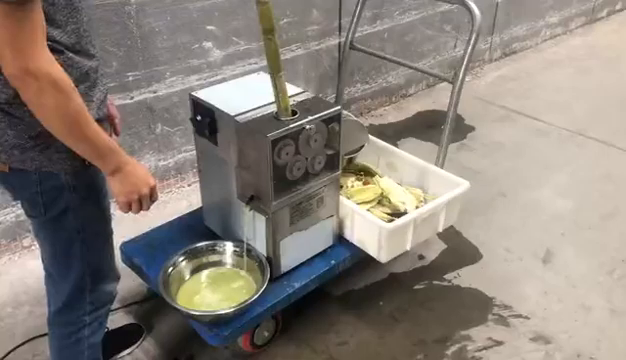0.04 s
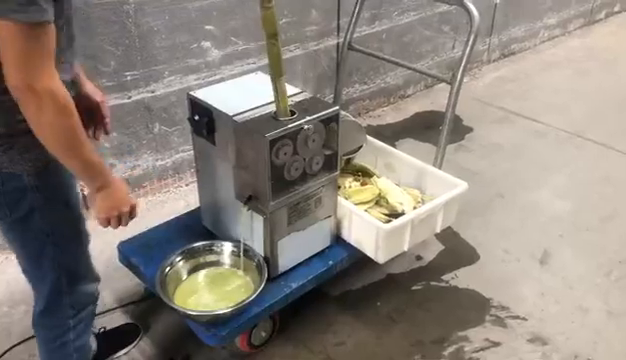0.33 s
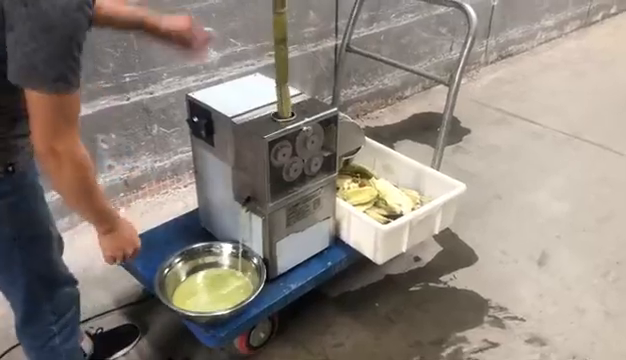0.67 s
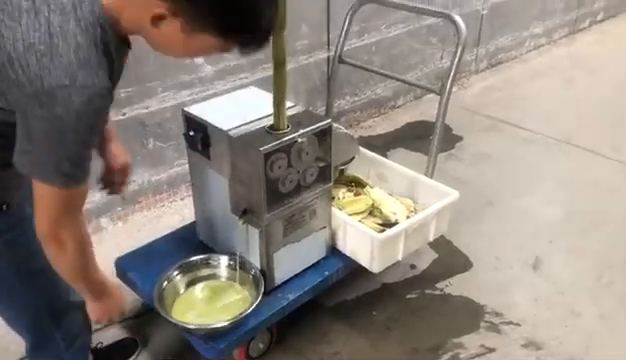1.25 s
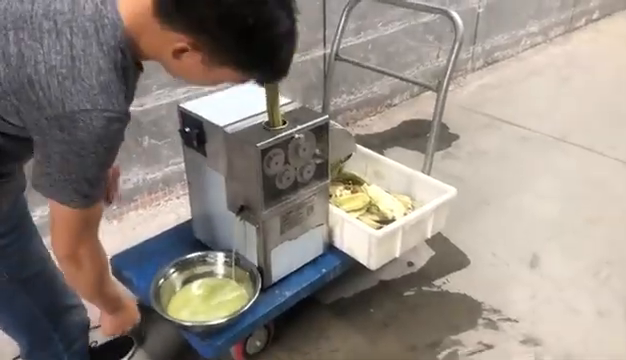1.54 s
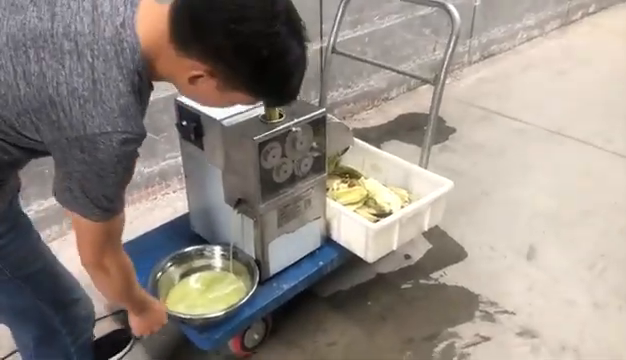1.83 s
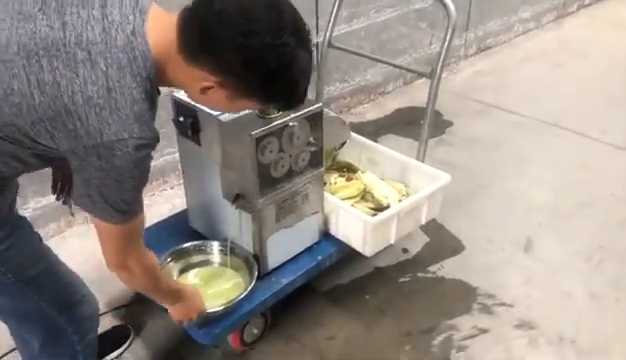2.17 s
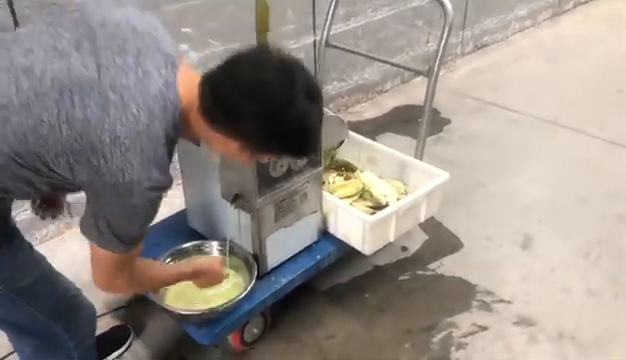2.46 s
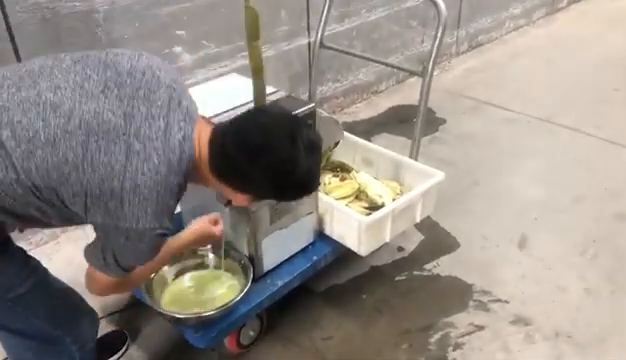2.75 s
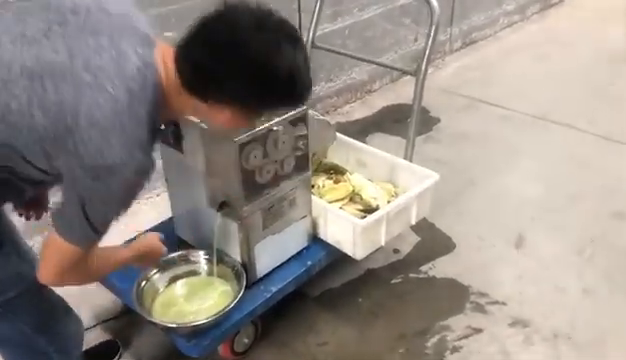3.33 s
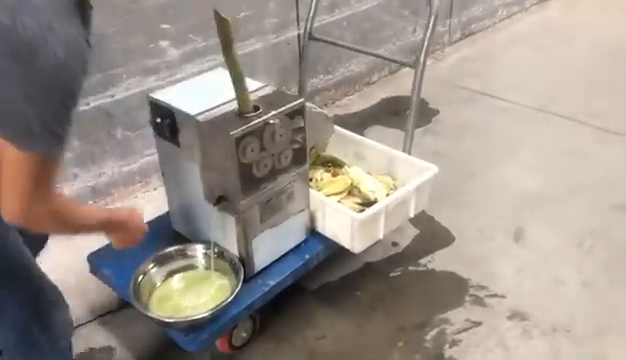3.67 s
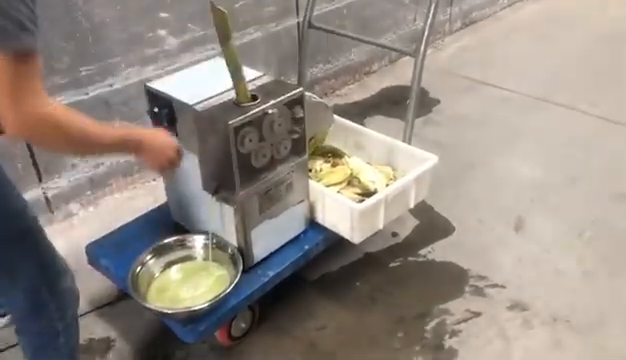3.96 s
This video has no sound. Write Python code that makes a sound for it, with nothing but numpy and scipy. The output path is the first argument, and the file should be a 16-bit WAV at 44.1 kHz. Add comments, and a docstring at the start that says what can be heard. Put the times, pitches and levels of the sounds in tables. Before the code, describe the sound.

A sugarcane juicer drones and grinds straight ahead of the microphone, outdoors near a wall. The cane crackles and snaps in the rollers, a panel hums briefly, then louder cracks come with housing thuds and a steel clack.

```python
"""A motor hums and gears whine and grind in a steel housing while wet fibres crackle:
an electric sugarcane juicer draws a stalk through its rollers. Now and then the stalk splits
with a crack, panels hum up under the strain, the housing thuds and the rollers clack.
The yard is paved; a wall close behind reflects the snaps and knocks."""
import sys
import numpy as np
from scipy import signal
from scipy.fft import rfft, irfft
from scipy.io import wavfile
from scipy.ndimage import uniform_filter1d

SR = 44100
rng = np.random.default_rng(int(sys.argv[2]) if len(sys.argv) > 2 else 0)


def wav_out(sig):
    """Save sig, one row per channel (or a flat mono array), as 16-bit PCM at SR to the path in sys.argv[1]."""
    wavfile.write(sys.argv[1], SR, np.round(np.clip(np.atleast_2d(sig).T, -1, 1) * 32767).astype(np.int16))


N = 176400
T = np.arange(N) / SR


def undb(db):
    """Decibels to gain."""
    return 10 ** (np.asarray(db) / 20)


def unit(x):
    """Scale to rms 1."""
    return x / np.sqrt(np.mean(x ** 2) + 1e-18)


def band(x, centre_hz, width_hz):
    """One resonance."""
    q = centre_hz / min(width_hz, SR / 4)
    return signal.lfilter(*signal.iirpeak(centre_hz, q, fs=SR), x)


def below(x, cutoff_hz):
    """Zero-phase low-pass."""
    return signal.sosfiltfilt(signal.butter(2, cutoff_hz, fs=SR, output="sos"), x)


def colour(x, points):
    """Shape the spectrum by (freq_hz, gain_db) points."""
    freq_hz, gain_db = np.array(points).T
    bin_hz = np.maximum(np.arange(N // 2 + 1) * SR / N, 1)
    return irfft(rfft(x) * undb(np.interp(np.log(bin_hz), np.log(freq_hz), gain_db)), N)


def walk(steps_per_s):
    """Smooth random drift, rms 1."""
    hold = max(int(SR / steps_per_s), 2)
    steps = rng.standard_normal(N)[np.arange(N) // hold]
    return unit(uniform_filter1d(uniform_filter1d(steps, hold), hold))


def clicks(per_s, scatter_db):
    """Impulses of random time, size and sign, rms 1."""
    size = undb(scatter_db * np.minimum(rng.exponential(size=N), 4))
    hits = rng.random(N) < per_s / SR
    return unit(hits * size * np.sign(rng.standard_normal(N)))


def tone(pitch_hz):
    """Sine on a moving pitch, rms 1."""
    return np.sqrt(2) * np.sin(2 * np.pi * (np.cumsum(pitch_hz) / SR + rng.random()))


def fade(start_s, decay_s):
    """Full level until start_s, then exponential decay."""
    return np.exp(-np.clip((T - start_s) / decay_s, 0, 20))


# Motor speed: time_s, pitch_hz
MOTOR_PITCH = [(0, 55.9), (1.6, 55.9), (1.75, 54.6), (4, 54.6)]


def motor_hum(level_db=-58, waver_db=.6):
    """The hum sags in pitch as the stalk gets thicker."""
    pitch_hz = np.interp(T, *np.array(MOTOR_PITCH).T)
    return tone(pitch_hz) * undb(level_db + waver_db * walk(8.4))


# Harmonics of the tooth rate: order, level_db
MESH_HARMONICS = [(2, -59.5), (3, -62.5), (4, -70), (5, -64.5), (10, -67), (12, -71.5)]


def gear_whine(mesh_hz=196.1, wander=.00203, waver_db=1.5):
    """Meshing teeth sound harmonics that drift together in pitch and waver singly in level."""
    tooth_hz = mesh_hz * (1 + wander * walk(12))
    out = np.zeros(N)
    for order, level_db in MESH_HARMONICS:
        out += undb(level_db) * unit(tone(order * tooth_hz) * undb(waver_db * walk(16)))
    return out


# Resonant machine parts: pitch_hz, width_hz, level_db
PART_MODES = [(68, 8, -71), (83, 3, -68), (94.5, 3, -62), (109, 6, -65), (163, 6, -63.5), (187, 5, -65),
              (203, 8, -65), (263, 6, -66), (298, 8, -65), (371, 6, -66), (456, 6, -69), (614, 8, -67),
              (688, 8, -69), (933, 14, -68), (1136, 10, -66)]


def part_drones():
    """Parts shaken by the drive drone in narrow bands."""
    out = np.zeros(N)
    for pitch_hz, width_hz, level_db in PART_MODES:
        shaken = band(rng.standard_normal(N), pitch_hz, width_hz)
        out += undb(level_db) * unit(band(shaken, pitch_hz, width_hz))
    return out


# Grinding spectrum: freq_hz, gain_db
GRIND_SPECTRUM = [(20, -15), (40, -7.5), (70, -2), (100, 3), (190, 4.5), (400, 1.5), (550, -2.5),
                  (850, -1.5), (1050, -3.5), (1450, -6), (2130, -6.5), (2500, -10.5), (3400, -12),
                  (4100, -13), (4400, -21), (5400, -21), (5900, -20), (6300, -23.5), (7600, -26.5)]
# Grinding band gains: time_s, bass_db, middle_db, treble_db
GRIND_GAINS = [(0, 2, 0.5, 1), (.35, -2, -3.5, 2.5), (0.749, 0, -1, 5), (1.02, 0.5, -3, 3.5),
               (1.5, -1, -1.5, -1), (1.799, 2, 2, 9), (2.0, -1.5, 1, 4.5), (2.18, -0.5, 1.5, 3.5),
               (2.45, -.5, 0, 3.5), (2.75, 1.5, 1.4, 6), (3.199, 0.5, 3, 7), (3.55, 0, -1, 4),
               (4, 0, 2, 7.5)]


def grinding(level_db=-46.5, flutter_db=.7, bass_hz=560, treble_hz=4570):
    """Dense small impacts of gears and rollers, fluttering with the load."""
    grind = unit(colour(clicks(per_s=2500, scatter_db=-.5), GRIND_SPECTRUM))
    bass, body = below(grind, bass_hz), below(grind, treble_hz)
    middle, treble = body - bass, grind - body
    times_s, *gains_db = np.array(GRIND_GAINS).T
    load_db = flutter_db * walk(26)
    return sum(part * undb(level_db + np.interp(T, times_s, gain_db) + load_db)
               for part, gain_db in zip((bass, middle, treble), gains_db))


def fibre_crackle(level_db=-59, snaps_per_s=260, decay_s=.003, surge_db=3, tilt_db_per_oct=-3):
    """Weak wet fibres snap in irregular surges, each with its own brief pitch."""
    out = np.zeros(N)
    surge = undb(surge_db * np.minimum(walk(22), 1))
    pitches_hz = np.geomspace(1730, 7500, 16)
    for pitch_hz in pitches_hz:
        snaps = np.abs(clicks(snaps_per_s / len(pitches_hz), scatter_db=3))
        envelope = signal.lfilter([1], [1, -np.exp(-1 / (decay_s * SR))], snaps)
        ticks = band(envelope * rng.standard_normal(N), pitch_hz, width_hz=270)
        out += unit(ticks) * undb(tilt_db_per_oct * np.log2(pitch_hz / pitches_hz[0]))
    return undb(level_db) * unit(out * surge)


# Splits in the stalk: start_s, level_db, centre_hz, width_hz, length_s
STALK_CRACKS = [(.0503, -41.5, 6070, 4130, .0063), (0.117, -51.5, 3970, 900, 0.0035),
                (0.121, -53, 5860, 2480, 0.0065), (0.198, -52.5, 6220, 1395, 0.011),
                (.218, -52.5, 6180, 1820, 0.027), (0.364, -47, 2420, 495, 0.004),
                (.377, -46.5, 4220, 1150, 0.0077), (0.491, -48.5, 4620, 2000, .0028),
                (.501, -47.5, 5200, 4150, .0032), (0.581, -42, 3730, 1180, 0.0018),
                (0.589, -43.5, 4330, 1790, 0.0028), (0.626, -45, 4440, 3030, 0.012),
                (0.738, -50, 3070, 510, 0.011), (0.84, -53, 4970, 2490, 0.011),
                (0.969, -45, 2550, 390, .0039), (1.125, -54, 4500, 2990, 0.039),
                (1.325, -50, 3440, 602, 0.0081), (1.438, -56.5, 6300, 894, .004),
                (1.522, -53, 5820, 1220, 0.0054), (1.601, -51.5, 3690, 900, 0.0042),
                (1.633, -46.5, 2470, 708, .0042), (1.679, -38.5, 3450, 1690, 0.0048),
                (1.686, -43.5, 1390, 794, 0.0079), (1.695, -34.5, 4980, 3600, 0.0051),
                (1.701, -38, 3720, 349, 0.0062), (1.72, -45.5, 3480, 2200, 0.003),
                (1.733, -45, 3880, 350, .005), (1.888, -60, 3820, 1810, .008),
                (1.988, -46, 5100, 4040, 0.0083), (2.561, -51.5, 6390, 2530, 0.037),
                (2.584, -43.5, 2860, 1510, 0.0061), (2.721, -45.5, 3380, 3010, 0.0031),
                (2.802, -47.5, 2830, 700, .004), (2.925, -36, 3400, 2020, 0.0025),
                (3.049, -38, 4700, 1990, 0.009), (3.149, -45, 2310, 684, .012),
                (3.614, -48.5, 2940, 1206, .008), (3.685, -47.5, 6230, 700, .003),
                (3.714, -45.5, 4010, 329, 0.009)]


def stalk_cracks(first_snap_db=-6, release_s=.002):
    """A fibre bundle breaks with one sharp snap, then tears in a short volley."""
    out = np.zeros(N)
    for start_s, level_db, centre_hz, width_hz, length_s in STALK_CRACKS:
        envelope = (T >= start_s) * fade(start_s + length_s, release_s)
        volley = clicks(per_s=6000, scatter_db=2.5) * envelope
        volley[int(start_s * SR)] += undb(first_snap_db) * np.linalg.norm(volley)
        tear = band(band(volley, centre_hz, 2 * width_hz), centre_hz, 2 * width_hz)
        out += undb(level_db) * unit(tear) * np.sqrt(length_s * SR / N)
    return out


# Humming panels: start_s, length_s, pitch_hz, level_db
PANEL_SWELLS = [(.63, .25, 189, -50.5), (.67, .19, 298, -54.5)]


def panel_swells(ramp_s=.05, wander=.008):
    """While the rollers strain, a panel hums up, holds and dies away."""
    out = np.zeros(N)
    for start_s, length_s, pitch_hz, level_db in PANEL_SWELLS:
        strain = np.clip(np.minimum(T - start_s, start_s + length_s - T) / ramp_s, 0, 1)
        out += undb(level_db) * strain * tone(pitch_hz * (1 + wander * walk(20)))
    return out


# Thuds: start_s, level_db, rattle_decay_s, rattle_cutoff_hz, jolt_cutoff_hz, jolt_gain_db
HOUSING_THUDS = [(1.703, -40.5, 0.068, 420, 1900, 6), (2.597, -40, .05, 800, 800, -0.5),
                 (3.162, -39, 0.078, 395, 600, -7)]
# Housing resonances: pitch_hz, width_hz, gain_db
HOUSING_MODES = [(224, 56, 0.5), (281, 50, 7), (395, 80, 0.5), (495, 46, 5.5), (732, 63, 1),
                 (955, 130, 3.5), (1250, 180, -13), (2110, 180, -1)]


def housing_thuds(jolt_decay_s=.013, low_cut_hz=200):
    """The stalk gives way; a short jolt of the rollers leaves the housing in a dull rattle."""
    out = np.zeros(N)
    for start_s, level_db, decay_s, rattle_cutoff_hz, jolt_cutoff_hz, jolt_gain_db in HOUSING_THUDS:
        jolt = below(rng.standard_normal(N), jolt_cutoff_hz) * fade(start_s, jolt_decay_s)
        rattle = below(rng.standard_normal(N), rattle_cutoff_hz) * fade(start_s, decay_s)
        push = (T >= start_s) * (undb(jolt_gain_db) * jolt + rattle)
        ring = sum(undb(gain_db) * band(push, pitch_hz, width_hz)
                   for pitch_hz, width_hz, gain_db in HOUSING_MODES)
        thud = ring - below(ring, low_cut_hz)
        out += undb(level_db) * unit(thud) * np.sqrt(decay_s / 2 * SR / N)
    return out


# Double clack: start_s, level_db
ROLLER_CLACKS = [(2.592, -40.5), (2.5962, -37)]
# Steel resonances: pitch_hz, t60_s, gain_db
STEEL_MODES = [(738, 0.14, -5), (1292, 0.058, 1), (2106, 0.032, 0), (2630, .025, -0.5), (2940, 0.016, -2.5),
               (3400, 0.045, -3), (3850, 0.027, 2), (4150, .035, -3.5)]


def roller_clacks():
    """Hard contacts at the rollers ring the steel briefly."""
    out = np.zeros(N)
    for start_s, level_db in ROLLER_CLACKS:
        age_s = np.maximum(T - start_s, 0)
        for pitch_hz, t60_s, gain_db in STEEL_MODES:
            ring = np.sin(2 * np.pi * pitch_hz * age_s) * fade(start_s, t60_s / np.log(1000))
            out += rng.choice([-1, 1]) * undb(level_db + gain_db) * ring
    return out


def yard(x, wall_delay_s=.0125, wall_db=-19, tail_decay_s=.06, tail_db=-14):
    """Direct sound, one wall reflection and a short scattered tail."""
    reflection = np.interp(T - wall_delay_s, T, x, left=0)
    tail = rng.standard_normal(N) * np.exp(-T / tail_decay_s)
    scattered = signal.fftconvolve(x, tail / np.linalg.norm(tail))[:N]
    return x + undb(wall_db) * reflection + undb(tail_db) * scattered


def side_hiss(x, level_db=-64.5, band_hz=(4150, 6700)):
    """Faint added hiss that follows the treble strength of x."""
    treble = signal.ellip(6, 1, 60, band_hz, "bandpass", fs=SR, output="sos")
    power = uniform_filter1d(signal.sosfilt(treble, x) ** 2, size=240)
    hiss = signal.sosfilt(treble, rng.standard_normal(N))
    return undb(level_db) * unit(hiss * np.sqrt(np.abs(power)))


def scene():
    """The machine sounds straight ahead; a faint added treble hiss makes the ears differ slightly."""
    running = motor_hum() + gear_whine() + part_drones() + panel_swells() + grinding()
    impacts = fibre_crackle() + stalk_cracks() + roller_clacks() + housing_thuds()
    machine = running + yard(impacts)
    side = side_hiss(machine)
    return np.array([machine + side, machine - side])


def record(dry, start_s=.036, cutoff_hz=7570):
    """Abrupt start, steep low-pass."""
    low_pass = signal.ellip(12, .2, 80, cutoff_hz, fs=SR, output="sos")
    return signal.sosfilt(low_pass, dry * (T >= start_s))


dry = scene()
out = record(dry)
wav_out(out)
```